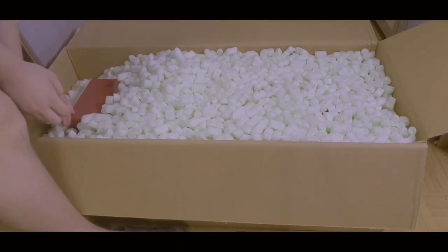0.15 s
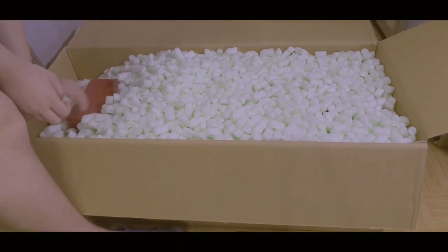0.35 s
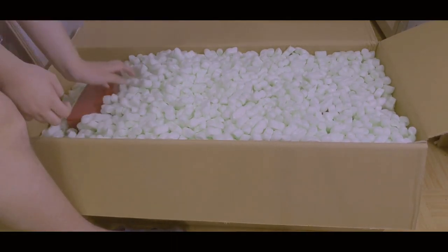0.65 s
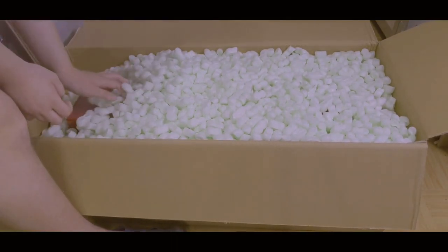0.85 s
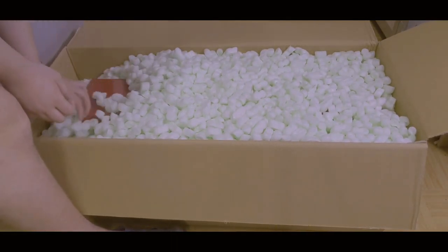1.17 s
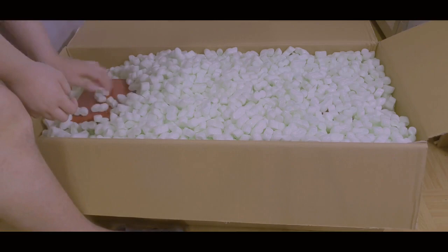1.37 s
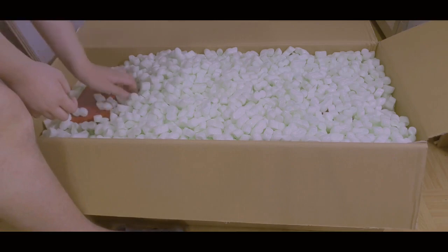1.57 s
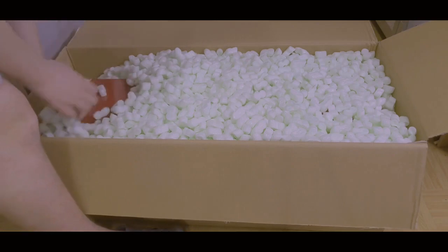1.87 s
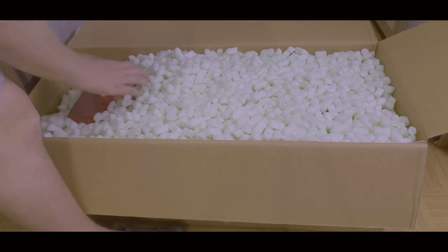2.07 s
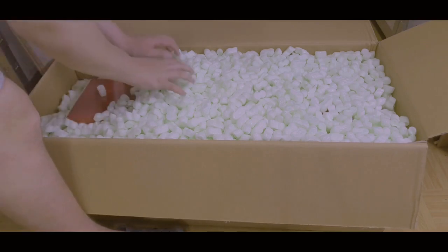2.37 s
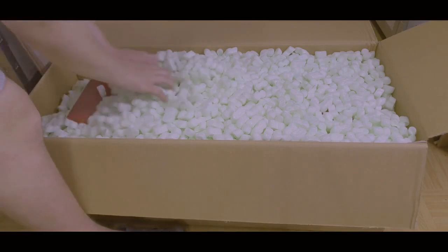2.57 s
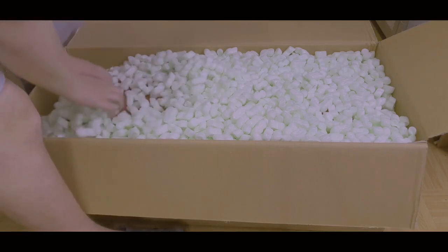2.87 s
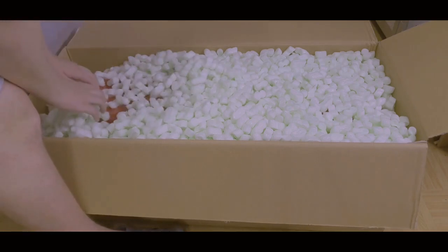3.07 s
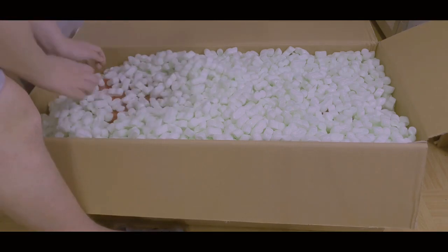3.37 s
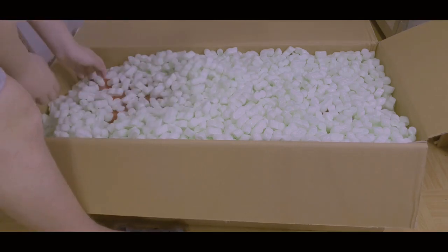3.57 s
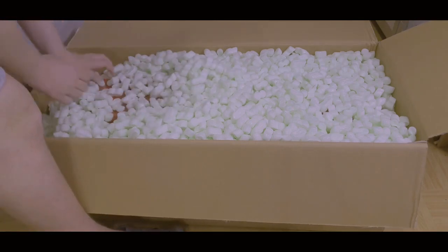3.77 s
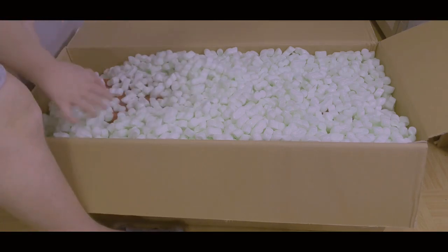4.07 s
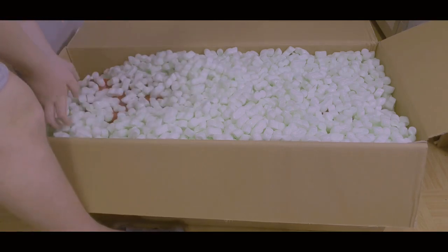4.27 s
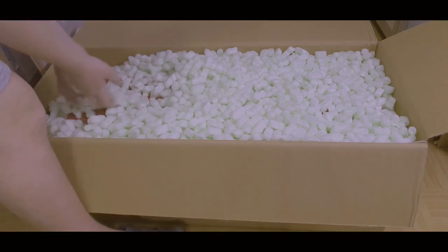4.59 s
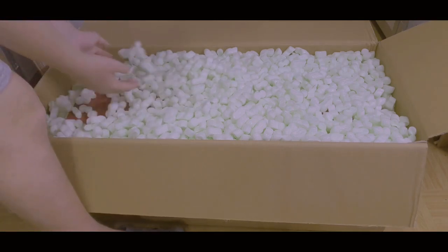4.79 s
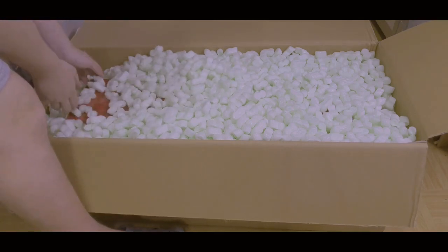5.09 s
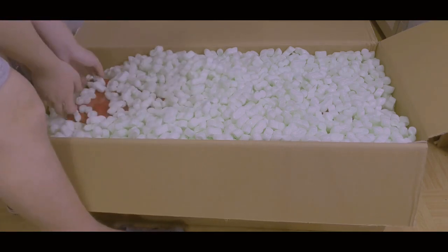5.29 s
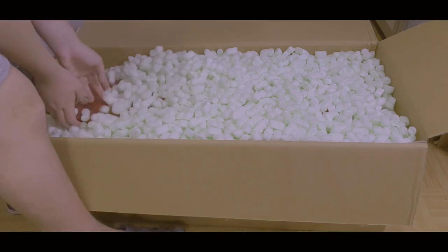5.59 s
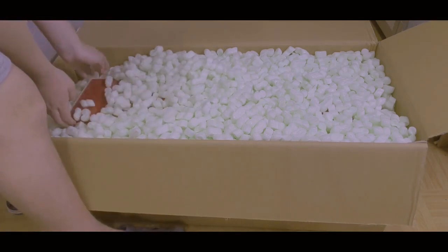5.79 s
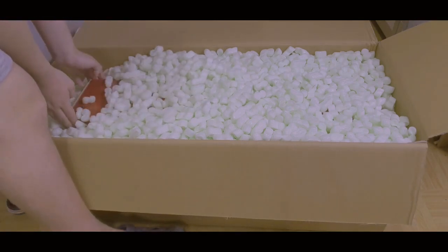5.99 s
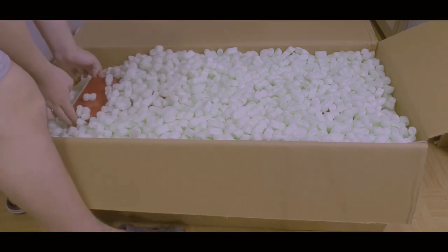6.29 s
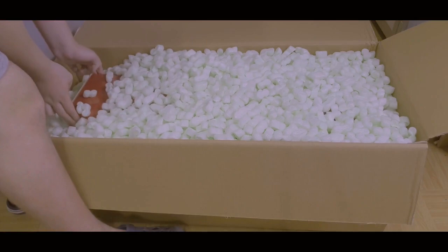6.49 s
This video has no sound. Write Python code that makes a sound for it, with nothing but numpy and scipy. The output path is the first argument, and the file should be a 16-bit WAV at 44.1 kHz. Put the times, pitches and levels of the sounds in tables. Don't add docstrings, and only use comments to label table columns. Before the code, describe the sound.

Close stereo sound of fingers stirring light foam peanuts indoors. Brittle crackle and dry rustle come in uneven bursts, with pops, fingernail ticks and dull cardboard thuds. One piercing squeak slips out early on; the strongest sweep follows about a second later. Pellets trickle and settle in the pauses, over faint hiss and a barely audible distant motor hum, before busy digging to the end.

```python
import sys
import numpy as np
from scipy import signal
from scipy.fft import rfft, irfft, next_fast_len
from scipy.io import wavfile

SR = 44100
rng = np.random.default_rng(int(sys.argv[2]) if len(sys.argv) > 2 else 0)


def how_loud(loudness_db):
    steps = np.asarray(loudness_db, float) / 20
    return 10 ** steps


def store_wav(level_fs):
    pcm = np.round(np.clip(np.atleast_2d(level_fs), -1, 1) * 32767)
    wavfile.write(sys.argv[1], SR, pcm.T.astype(np.int16))


N = 292824

# f/Hz, level/dB per Hz
HISS_SPECTRUM = [(140, -20), (300, -18.5), (770, -30), (1020, -17), (1200, -44), (2000, -38.5), (6650, -20),
                 (8200, -18.5), (11000, -25.5), (16000, -22)]
# t/s, f/Hz, level/dB
MOTOR_HUM = [(0, 192, -74), (.5, 193.8, -76), (.9, 195.6, -63.5), (1.15, 193, -92), (2.0, 193.8, -79.5),
             (2.4, 195.3, -80), (3.2, 184, -93), (3.6, 186, -85), (4.2, 189.5, -96), (4.5, 169, -97),
             (6.64, 200, -102)]
# f/Hz, t60/s
ROOM_T60 = [(60, 0.9), (500, 0.32), (3000, 0.52), (8000, 0.56), (16000, 0.047)]
# f/Hz, level/dB
ECHO_LEVEL = [(40, -12), (150, -18.5), (400, -9.5), (900, -9.5), (2000, -5.5), (4000, 0.5), (8000, -8),
              (16000, -3.5)]
# f/Hz, left-right level/dB
PORT_BALANCE = [(60, -2.5), (180, -1.5), (550, -0.5), (1650, 0.5), (4970, 1), (15000, 3)]
# f/Hz, width/Hz, level/dB
PANEL_MODES = [
    (112, 4.6, -13.5),
    (414, 10, -4.5),
    (585, 32, -3.5),
    (850, 12, -8),
    (1151, 45, -26),
    (1590, 60, -41),
]
# start t/s, length t/s, force level/dB
SHOVES = [(0.045, 0.083, -62), (0.68, 0.087, -73), (0.933, 0.012, -65.5), (1.05, 0.0312, -71),
          (1.567, 0.14, -65), (1.95, 0.013, -75.5), (2.407, 0.33, -60.5), (2.81, 0.12, -61.5),
          (4.327, 0.12, -60.5), (4.616, 0.28, -78.5), (5.07, 0.089, -64), (5.476, 0.033, -56.5),
          (5.763, 0.034, -62), (5.886, 0.012, -51.5), (6.006, 0.036, -56.5), (6.15, 0.21, -61.5),
          (6.295, 0.36, -59)]
# t/s, peak level/dB, centre f/Hz
KNOCKS = [(0.06, -44, 109), (0.657, -37, 1140), (0.924, -38, 1300), (1.548, -35, 1680), (1.657, -42.5, 91),
          (1.781, -42, 815), (1.919, -42, 844), (2.424, -33, 850), (3.568, -47.5, 1320), (4.318, -39, 170),
          (4.423, -24.5, 1590), (4.615, -35, 890), (5.087, -47, 86), (5.125, -42, 450), (5.46, -36, 330),
          (5.732, -42, 1280), (5.865, -27.5, 442), (5.987, -22.5, 1560), (6.05, -45, 84)]
# t/s, peak level/dB, f/Hz
TAPS = [(0.617, -49, 1790), (0.66, -41, 573), (0.722, -38, 412), (0.812, -44, 1170), (0.926, -37, 1300),
        (1.028, -40, 611), (1.122, -43, 1020), (1.21, -51, 754), (1.238, -53, 1050), (1.287, -51, 611),
        (1.515, -57, 1030), (1.545, -46, 1710), (1.789, -42, 428), (1.927, -48, 361), (2.39, -44, 934),
        (2.403, -38, 506), (2.432, -32, 899), (2.589, -31, 888), (2.674, -31, 301), (3.082, -47, 565),
        (3.558, -59, 1330), (3.969, -45, 746), (4.303, -43, 659), (4.344, -40, 993), (4.431, -36, 1570),
        (4.606, -43, 1150), (4.785, -46, 1040), (4.822, -44, 993), (4.922, -51, 754), (5.13, -40, 1350),
        (5.409, -53, 560), (5.435, -45, 614), (5.463, -37, 323), (5.532, -36, 1120), (5.658, -43, 999),
        (5.735, -46, 1280), (5.822, -47, 406), (5.862, -34, 439), (5.984, -33, 1360), (6.014, -35, 579)]
# t/s, peak level/dB
NAIL_TICKS = [(0.5911, -47), (1.0137, -31), (1.0694, -32), (1.9545, -51), (2.592, -24), (2.943, -30),
              (3.5713, -43), (3.9155, -54), (4.2657, -41.5), (5.082, -40), (5.2619, -50), (5.3426, -41),
              (5.4864, -29), (5.863, -31.5), (5.9244, -34), (5.9408, -29), (6.0254, -42), (6.0594, -27),
              (6.1494, -35), (6.1707, -43)]
# t/s, f/Hz, level/dB, left-right level/dB
CREAK = [
    (3.955, 750, -87, -2.5),
    (3.972, 760, -50, 1),
    (3.984, 730, -55.5, 3),
    (3.995, 752, -75, 5),
    (4.012, 732, -63, 2),
    (4.05, 755, -88, 2),
]
# multiple/1, level/dB
CREAK_PARTIALS = [(.79, -11.5), (1, -3), (3, -17), (2, -9)]
# t/s, f/Hz, level/dB, left-right level/dB
PALM_SLIDE = [
    (0, 1140, -77, 0),
    (.01, 1150, -75, 0),
    (.15, 1135, -75, -2),
    (.2, 1130, -92, 0),
]
# t/s, f/Hz, level/dB, left-right level/dB
SQUEAK = [
    (1.585, 6750, -62, 1),
    (1.599, 6800, -45, 2),
    (1.606, 6750, -32, 3.5),
    (1.625, 6850, -34.5, 5.5),
    (1.638, 7020, -24.5, -6.5),
    (1.65, 7115, -30.5, -12.5),
    (1.676, 7110, -30.5, -3),
    (1.69, 7030, -53, -5),
    (1.705, 7130, -41, -5),
    (1.77, 7010, -60, 3),
]
# multiple/1, level/dB
SQUEAK_PARTIALS = [(0.975, -17), (1, -2), (1.03, -13.5), (1.86, -22), (1.94, -20), (0.95, -21.5),
                   (2.04, -24)]
# t/s, f/Hz, level/dB, left-right level/dB
CHIRP = [
    (1.6, 7950, -55, 0),
    (1.612, 8000, -38, 0),
    (1.625, 8150, -54, 0),
    (1.646, 8200, -27, 0),
    (1.656, 8200, -46, 0),
    (1.7, 8250, -50, 0),
]
# multiple/1, level/dB
CHIRP_PARTIALS = [(1, -2), (1.87, -26)]
# t/s, f/Hz, level/dB, left-right level/dB
SQUEAK_OCTAVE = [
    (1.586, 13600, -55, 2),
    (1.595, 13650, -42, 2),
    (1.612, 13500, -42, 2),
    (1.626, 14050, -33, 2),
    (1.64, 14200, -36, 2),
    (1.648, 14200, -46, 2),
    (1.675, 14150, -52, 2),
]
# t/s, peak level/dB, centre f/Hz, dull part level/dB re peak
SNAPS = [(0.4964, -54, 6610, -21), (0.59, -43, 4970, -21.5), (0.9228, -16, 3770, -19),
         (1.521, -46, 5950, -10), (1.5459, -38, 5220, -10), (1.7797, -28.5, 4480, -28),
         (1.9543, -40, 4270, -20), (2.16, -46.5, 4520, -29), (2.382, -32, 3900, -10),
         (2.592, -27, 6080, -12), (2.9407, -32, 5200, -16), (3.3623, -44.5, 4100, -22),
         (3.5718, -40.5, 5350, -14), (4.2656, -42, 5180, -35), (4.2857, -41, 3900, -25),
         (4.343, -36, 4940, -13), (4.4176, -36, 3440, -22), (4.644, -30.5, 5740, -18),
         (5.0822, -50, 7000, -23.5), (5.262, -45, 4620, -17), (5.3428, -41, 4800, -13),
         (5.4363, -32, 4900, -18), (5.4859, -23, 4250, -6), (5.7317, -29, 4900, -8),
         (5.8631, -32, 5870, -16), (5.9244, -40, 5400, -10), (5.9383, -37, 5630, -20),
         (6.059, -26, 4390, -25), (6.1436, -24.5, 4070, -20), (6.1692, -34, 3980, -14)]
# t/s, peak level/dB, f/Hz
POPS = [(0.1039, -51.5, 5600), (0.1425, -51, 4350), (0.2053, -60, 5940), (0.2238, -62, 5210),
        (0.2397, -57, 5170), (0.2689, -58, 5680), (0.405, -64, 6760), (0.4975, -58, 6630),
        (0.5913, -44, 4910), (0.9228, -25, 5120), (1.0918, -37, 4650), (1.3291, -49, 4910),
        (1.4635, -56, 6200), (1.4994, -57, 3320), (1.7866, -34, 4520), (1.794, -36, 4350),
        (1.9549, -44, 4260), (2.0395, -50, 4350), (2.0662, -51, 3880), (2.1209, -55, 4740),
        (2.1603, -49, 5860), (2.2323, -60, 4220), (2.3573, -63, 6460), (2.5926, -27, 6120),
        (2.9269, -30, 6070), (2.9434, -25, 6500), (3.238, -48, 5250), (3.3626, -52, 4950),
        (3.4332, -58, 4570), (3.4464, -59, 5380), (3.5734, -45, 5270), (3.591, -42, 5250),
        (3.8655, -46, 5990), (3.9163, -49, 5770), (4.2666, -46, 6290), (4.3489, -29, 4740),
        (4.4214, -27, 4480), (4.6462, -33, 5640), (5.0615, -49, 5300), (5.0834, -38, 7020),
        (5.2623, -46, 5170), (5.271, -50, 5770), (5.3434, -42, 4870), (5.4361, -34, 3780),
        (5.486, -26, 3830), (5.5059, -25, 3570), (5.6171, -35, 3920), (5.6781, -33, 4600),
        (5.7106, -42, 3880), (5.7325, -33, 4570), (5.7452, -33, 5080), (5.8535, -34, 6290),
        (5.8632, -28, 6120), (5.925, -31, 5340), (5.9408, -31, 5700), (5.9529, -32, 3700),
        (6.0627, -28, 4220), (6.1403, -32, 4220), (6.1708, -24, 4050),
        (.9135, -36, 5500),
    (.917, -34, 4500),
    (1.036, -33, 6000),
    (1.083, -33, 5900),
    (3.872, -55, 4500),
    (3.89, -55, 4600),
    (5.5125, -27, 4500),
    (5.562, -30, 5000),
]
PLUNGES = [0.921, 1.515, 1.545, 2.161, 3.559, 3.863, 4.266, 4.417, 5.082, 5.341, 5.404, 5.733]
# start t/s, length
# t/s, force level/dB, depth level/dB re force, swell level/dB
HEAP_MOVES = [(0.005, 0.14, -66, 2.5, -5.5), (0.61, 0.1, -49.5, -13.0, 7.5), (0.995, 0.11, -46.5, -9, 0),
              (1.547, 0.17, -48, -8, -3.5), (1.775, 0.054, -53.5, -1.5, 0), (2.404, 0.302, -40.5, -6.5, 1.5),
              (2.75, 0.24, -44.5, -6.5, -1), (3.583, 0.018, -54.5, -19, 0), (3.697, 0.016, -59, -14, -3.5),
              (3.847, 0.16, -66.5, -16, 6.5), (4.292, 0.061, -48, -13.5, 5.5), (4.409, 0.05, -42.5, -6, -3.5),
              (4.498, 0.102, -48, -12.0, -3), (4.624, 0.057, -46, -8.5, 2.5), (5.104, 0.032, -60.5, 0, 7),
              (5.265, 0.025, -58.5, -3.5, -7.5), (5.34, 0.21, -63.5, -3.5, 0), (5.438, 0.094, -44.5, -10, 3),
              (5.733, 0.015, -43.5, -16, -2.5), (5.834, 0.046, -48.5, -6, 5), (5.92, 0.17, -49.5, -4, 0),
              (6.124, 0.061, -48.5, -5, 2), (6.225, 0.39, -53, 0, 0.5),
              (0.495, 0.085, -76.5, -7, -9),
    (0.728, 0.19, -47, -7.5, -9.5),
    (0.912, 0.054, -37, -11.5, -6.5),
    (1.216, 0.34, -59.5, 1, -18.5),
    (1.898, 0.2, -57.5, -3.5, -10.5),
    (2.151, 0.063, -62.5, -30, -10),
    (3.058, 0.44, -58.5, -2.5, -19.5),
    (4.057, 0.16, -71, -9, -7),
    (4.75, 0.28, -56.0, -1, -10.5),
    (5.558, 0.12, -47.5, -5, -6),
              (0.18, .2, -79, -10, -5.5), (0.598, 0.014, -58.5, -18, 5), (1.07, .02, -46.5, -26, 0),
         (2.195, .06, -70.5, -14, -11.5), (5.762, .05, -59.5, -6.5, -1.5), (3.74, .1, -76, -8, 2),
         (5.08, .02, -59.5, -20, -1), (5.403, .025, -53.5, -17, -0.5), (1.075, 0.018, -45.5, -13, 0),
         (1.03, 0.011, -47.5, -12, 0), (3.955, .04, -59.5, -15, -0.5), (5.125, .045, -60, 5, -3),
         (4.33, .02, -48, -7, -1), (2.5, 0.035, -45.5, -6, 0), (2.935, 0.018, -45, -19, -1.5),
         (6.02, .02, -48, -1, -1.5), (1.75, .01, -56, -10, -2)]
# t/s, grip level/dB, loose pellets flung over the surface level/dB
GRIP = [(0, -6, -2.5), (.95, 3, 1), (1.2, -10.5, -3.5), (1.5, -1, 0), (1.65, 2.5, 6.5), (1.9, -6.5, -2),
        (2.2, -2, -0.5), (2.5, 3, 2), (3.0, -2, -0.5), (3.6, -1.5, -0.5), (4.2, 2, -1), (5.04, -1, 1),
        (5.14, 5, 5.5), (5.27, -4, 2.5), (5.55, 0, -1.5), (6.1, 0.5, 1.5), (6.25, 4, -3), (6.64, 7, 2.5)]
# f/Hz, level/dB per Hz
HEAP_SPECTRUM = [(21, -64), (35, -4.5), (70, 1.5), (126, -8), (185, -3), (360, -5), (410, -3.5),
                 (667, -7.5), (862, -5.5), (2280, -7), (4800, -14.5), (6690, -18.5), (8010, -40),
                 (12100, -39), (16000, -44.5)]
LAYER_EDGES = 200, 1320, 2650, 7400

PORT_LAG_S = -0.00014
PORT_DROP_DB = 15


def rms_one(x):
    return x / np.sqrt(np.mean(x ** 2) + 1e-20)


def in_time(rows):
    s, *columns = np.transpose(rows)
    return [np.interp(np.arange(N) / SR, s, c) for c in columns]


def at_hz(points, hz):
    table_hz, values = np.transpose(points)
    return np.interp(np.log(hz), np.log(np.maximum(table_hz, 1)), values)


def step(octaves, width):
    return .5 + .5 * np.tanh(octaves / width)


def drift(rate_hz):
    r = np.exp(-16 * np.pi * rate_hz / SR)
    slow = signal.lfilter([1], [1, -2 * r, r * r], rng.standard_normal(N // 8 + 4002))
    slow = rms_one(slow[4000:])
    return np.interp(np.arange(N) / 8, np.arange(len(slow)), slow)


def band(x, low_hz, high_hz):
    high_hz = min(high_hz, .46 * SR)
    sos = signal.butter(2, [low_hz, high_hz], "band", fs=SR, output="sos")
    return signal.sosfilt(sos, x + 1e-18) * np.sqrt(SR / 2 / (high_hz - low_hz))


def both_ports(x):
    return np.array([np.roll(x, round(PORT_LAG_S * SR)), x])


def floor():
    hz = np.maximum(np.arange(N // 2 + 1) * SR / N, 1)
    hiss = irfft(rfft(rng.standard_normal((2, N))) * how_loud(at_hz(HISS_SPECTRUM, hz)), N)
    distant = band(rng.standard_normal(N), 50, 98)
    return how_loud(-69.5) * rms_one(hiss) + how_loud(-88.5) * distant


def hum():
    hz, level_db = in_time(MOTOR_HUM)
    level = how_loud(level_db + 2.3 * drift(2.6))
    return np.sqrt(2) * level * np.sin(2 * np.pi * np.cumsum(hz) / SR)


def echoes(count):
    t = np.arange(SR // 2) / SR
    edges = 30 * 2 ** np.arange(0, 10.)
    echo = 0
    for low, high in zip(edges, np.minimum(2 * edges, .46 * SR)):
        hz = np.sqrt(low * high)
        tail = rng.standard_normal((count, 2, len(t)))
        tail = tail * how_loud(-60 * t / at_hz(ROOM_T60, hz)) * (t > .003)
        tail = tail / np.sqrt(np.sum(tail ** 2, axis=-1, keepdims=True))
        share = np.sqrt((high - low) / (SR / 2))
        echo = echo + band(tail, low, high) * how_loud(at_hz(ECHO_LEVEL, hz)) * share
    return echo


def room(x):
    size = next_fast_len(N + SR // 2)
    hz = np.maximum(np.arange(size // 2 + 1) * SR / size, 1)
    turn = np.pi * 1.3 * np.arange(N) / SR
    heard = rfft(x, size)
    for k, echo in enumerate(echoes(count=3)):
        share = np.sqrt(2 / 3) * np.abs(np.cos(turn + k * np.pi / 3))
        heard = heard + rfft(x.mean(axis=0) * share, size) * rfft(echo, size)
    keep = 1 / np.sqrt(1 + how_loud(2 * at_hz(ECHO_LEVEL, hz)))
    balance = how_loud(np.outer([.5, -.5], at_hz(PORT_BALANCE, hz)))
    return irfft(heard * keep * balance, size)[:, :N]


def box(x):
    out = x
    for hz, width_hz, gain_db in PANEL_MODES:
        r = np.exp(-np.pi * width_hz / SR)
        b = (1 - r * r) / 2 * np.array([1, 0, -1])
        a = [1, -2 * r * np.cos(2 * np.pi * hz / SR), r * r]
        out = out + how_loud(gain_db) * signal.lfilter(b, a, x)
    return out


def efforts(start, length, force_db, swell_db, attack_db_per_s, release_db_per_s, still_db):
    since = np.arange(0, N + 64, 64) / SR - np.c_[start]
    length = np.maximum(np.c_[length], .005)
    db = np.c_[force_db] + np.c_[swell_db] * np.clip(since / length, 0, 1)
    db = db - attack_db_per_s * np.maximum(-since, 0)
    db = db - release_db_per_s * np.maximum(since - length, 0)
    total = 10 * np.log10(how_loud(2 * db).sum(axis=0) + how_loud(2 * still_db))
    return np.interp(np.arange(N) / 64, np.arange(len(total)), total)


def walls():
    s, length, force_db = np.transpose(SHOVES)
    return 0.7 + efforts(s, length, force_db, 0 * s, attack_db_per_s=306.5,
                         release_db_per_s=143, still_db=-90.5)


def burst(s, peak_db, low_hz, high_hz, t60):
    t = np.arange(min(int(2 * t60 * SR) + 64, 4410)) / SR
    spray = band(rng.standard_normal(len(t)) * how_loud(-60 * t / t60), low_hz, high_hz)
    start = int(s * SR)
    spray = (how_loud(peak_db) * spray / np.abs(spray).max())[:N - start]
    return np.pad(spray, (start, N - start - len(spray)))


def knocks():
    out = np.zeros(N)
    for s, peak_db, hz in KNOCKS:
        out += burst(s, peak_db - 11.5, hz / 1.15, hz * 1.05, 0.043 + 5.7 / hz)
    return both_ports(out)


def nails():
    out, t60 = np.zeros(N), .014
    for s, peak_db in NAIL_TICKS:
        out += burst(s, peak_db - 7, 3500, 7200, t60)
        out += burst(s, peak_db + 8, 7200, 17500, t60)
    return both_ports(out)


def pops(rows, cycles, trim_db, grit):
    out = np.zeros(N + SR)
    t = np.arange(1764) / SR
    for s, peak_db, hz in rows:
        ring = np.sin(2 * np.pi * hz * t) + grit * rng.standard_normal(len(t))
        ring = ring * how_loud(-60 * t * hz / cycles) * np.minimum(t / .0006, 1)
        out[int(s * SR):][:len(t)] += how_loud(peak_db + trim_db) * ring
    return both_ports(out[:N])


def squeal(rows, parts, flutter_hz, flutter_db, wobble, fade_db_per_s):
    hz, level_db, pan_db = in_time(rows)
    t = np.arange(N) / SR
    on = (t > rows[0][0]) & (t < rows[-1][0])
    turns = 2 * np.pi * np.cumsum(hz * (1 + wobble * drift(flutter_hz))) / SR
    since = np.clip(t - rows[1][0], 0, 1)
    tone = 0
    for k, db in parts:
        throb_db = flutter_db * (1 + 5.8 * min(abs(k - 1), .4)) * drift(flutter_hz)
        fade_db = fade_db_per_s * (k - 1) * since
        tone = tone + how_loud(db + throb_db - fade_db) * np.sin(k * turns)
    tone = np.sqrt(2) * tone * on * how_loud(level_db + 3.5)
    return both_ports(tone) * how_loud([pan_db / 2, -pan_db / 2])


def creaks():
    creak = squeal(CREAK, CREAK_PARTIALS, flutter_hz=59.5, flutter_db=1.5, wobble=0.0166, fade_db_per_s=99)
    return creak + squeal(PALM_SLIDE, [(0.99, -2)], flutter_hz=40, flutter_db=5.0, wobble=.02, fade_db_per_s=0)


def squeaks():
    squeak = squeal(SQUEAK, SQUEAK_PARTIALS, flutter_hz=159.6, flutter_db=2.5, wobble=.006, fade_db_per_s=200)
    chirp = squeal(CHIRP, CHIRP_PARTIALS, flutter_hz=200, flutter_db=5.0, wobble=.008, fade_db_per_s=29.5)
    octave = squeal(SQUEAK_OCTAVE, [(1, -1), (.95, -11)], flutter_hz=180, flutter_db=2.5,
                    wobble=.006, fade_db_per_s=0)
    return squeak + chirp + octave


def snaps():
    out, t60 = np.zeros(N), 0.053
    for s, peak_db, hz, dull_db in SNAPS:
        out += burst(s, peak_db, hz / 1.2, hz * 1.08, t60)
        out += burst(s, peak_db - 6.5, 4000, 17500, 0.47 * t60)
        out += burst(s, peak_db + dull_db - 3.5, 400, 3200, 2.1 * t60)
    return both_ports(out)


def ports(clicks):
    at = np.flatnonzero(clicks)
    lag = PORT_LAG_S * SR + 3.5 * rng.standard_normal(len(at))
    late = at + np.round(lag).astype(int)
    left = np.zeros(N)
    np.add.at(left, np.clip(late, 0, N - 1), clicks[at])
    return np.array([left, clicks])


def ticks(per_s, spread_db):
    chance = np.clip(per_s / SR, 1e-4, 1)
    sizes = how_loud(spread_db * np.minimum(rng.exponential(1, N), 5)) * rng.choice([-1, 1], N)
    return ports(rms_one(sizes * (rng.random(N) < chance) / np.sqrt(chance)))


def slides(per_s, fade_s):
    starts = rng.exponential(1, N) * (rng.random(N) < per_s / SR)
    fading = signal.lfilter([1], [1, -np.exp(-1 / (fade_s * SR))], starts)
    return rms_one(fading - fading.mean())


def plunged(curves):
    read = np.arange(N)
    before, after = int(0.04 * SR), int(0.006 * SR)
    for s in PLUNGES:
        at = int(s * SR)
        read[at - before:at] = at - before
        read[at:at + after] = at + after
    return np.array(curves)[:, read]


def digging():
    s, length, force_db, depth_db, swell_db = np.transpose(HEAP_MOVES)
    still_db = -97.5
    top = efforts(s, length, force_db, swell_db, 722.5, 407.5, still_db)
    deep = efforts(s + 0.0066, length, force_db + depth_db, 1.6 * swell_db, 659, 251, still_db)
    crackle = top + 5.5
    hiss = -9 - 0.037 * (top + 50) + in_time(GRIP)[1]
    rustle = deep + 1.5
    crunch = -8 + 0.79 * np.minimum(deep - top, 4.5) - 5.5 + 7.0
    return crackle, hiss, rustle, crunch


def heap():
    crackle_db, hiss_db, rustle_db, crunch_db = plunged(digging())
    per_s = 2500 * how_loud(.4 * (crackle_db + 46) + 3.0 * drift(25))
    shared = ticks(per_s, spread_db=2.8)
    own = [ticks(.6 * per_s, spread_db=0.97) for _ in range(3)]
    clump = slides(per_s=99, fade_s=0.0075)
    edges = 7400 * 2 ** np.arange(-7.75, 1.3, .25)
    centres = np.sqrt(edges[1:] * edges[:-1])
    band_db = at_hz(HEAP_SPECTRUM, centres) + 10 * np.log10(np.diff(edges))
    layer_edges = np.array(LAYER_EDGES)
    layer = np.searchsorted(layer_edges, centres)
    total_db = 10 * np.log10(np.bincount(layer, how_loud(2 * band_db)))
    drive = np.array([walls(), rustle_db, crackle_db + crunch_db, crackle_db,
                      crackle_db + hiss_db + PORT_DROP_DB])
    drive = drive - total_db[:, None] + 3.5
    layer_steps = np.diff(drive, axis=0)
    grip_db = in_time(GRIP)[0]
    out = 0
    for k, (low, high, hz) in enumerate(zip(edges, edges[1:], centres)):
        blend = step(np.log2(hz / layer_edges), np.array([0.92, 0.12, 0.36, .04]))
        squeeze = np.exp(-(np.log2(hz / 2280) / 0.9) ** 2)
        level_db = drive[0] + blend @ layer_steps + grip_db * squeeze
        flicker_db = .9 * clump + 1.58 * drift(min(40, 0.06 * hz))
        contacts = 0.48 * shared + 0.65 * own[k % 3]
        out = out + band(contacts * how_loud(flicker_db), low, high) * how_loud(band_db[k] + level_db)
    return out


def scene():
    tick, creak, squeak = nails(), creaks(), squeaks()
    pop = pops(POPS, cycles=40, trim_db=-1, grit=.35)
    pop = pop + pops(TAPS, cycles=14, trim_db=-4, grit=.05)
    pellets = box(heap()) + snaps() + knocks()
    close = tick + pop + 0.89 * squeak + 0.49 * creak
    into_room = pellets + .5 * tick + .4 * pop + .45 * squeak + 0.31 * creak
    return room(into_room) + close + hum() + floor()


def top_cut(x):
    return signal.sosfilt(signal.butter(12, 16500, fs=SR, output="sos"), x)


def record(dry):
    hz = np.maximum(np.arange(N // 2 + 1) * SR / N, 1)
    port = how_loud(-PORT_DROP_DB * step(np.log2(hz / 7180), 0.057))
    treble_cut = signal.ellip(14, .5, 80, 15780, fs=SR, output="sos")
    bass_cut = signal.butter(4, 44, "high", fs=SR, output="sos")
    mix = signal.sosfilt(np.vstack([treble_cut, bass_cut]), irfft(rfft(dry) * port, N))
    return top_cut(mix)


dry = scene()
out = record(dry)
store_wav(out)
```